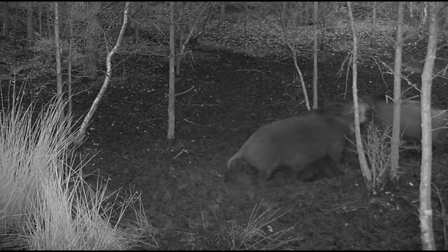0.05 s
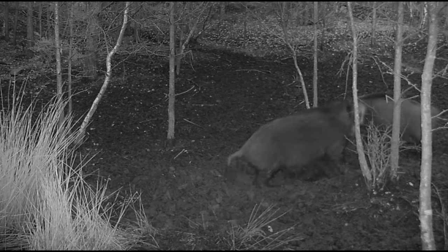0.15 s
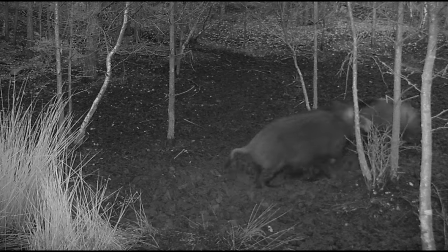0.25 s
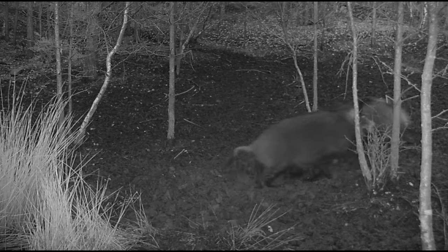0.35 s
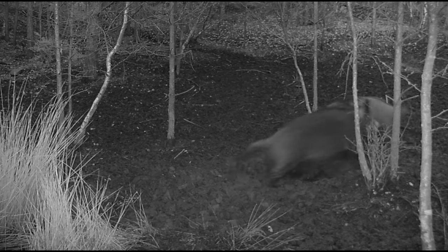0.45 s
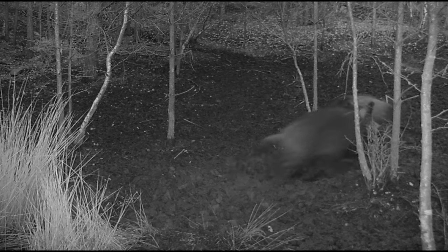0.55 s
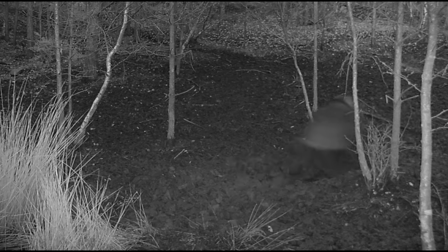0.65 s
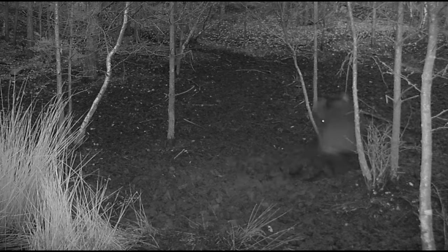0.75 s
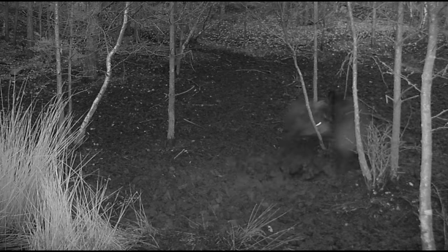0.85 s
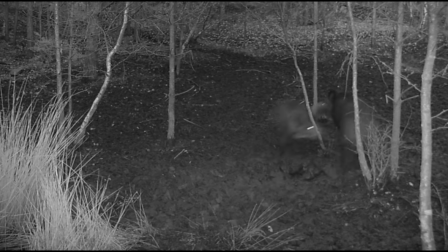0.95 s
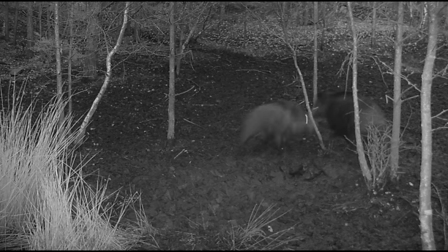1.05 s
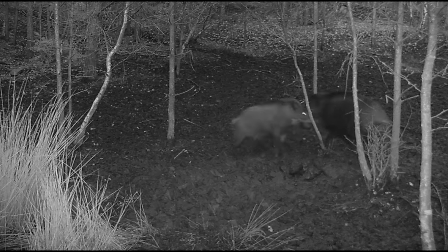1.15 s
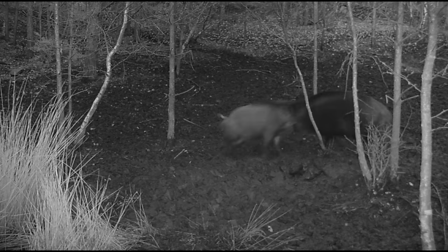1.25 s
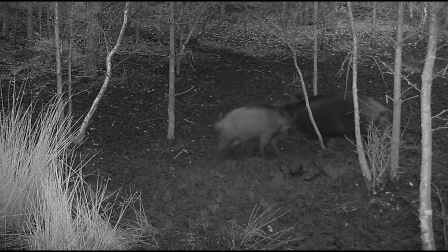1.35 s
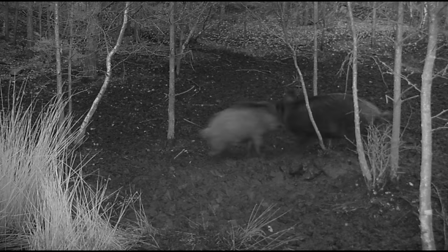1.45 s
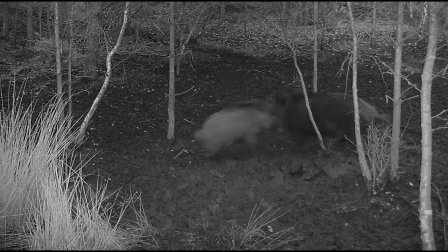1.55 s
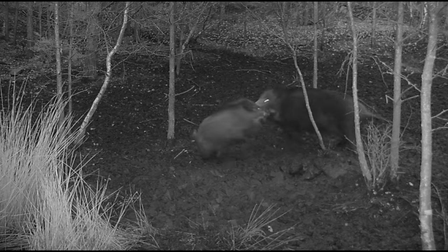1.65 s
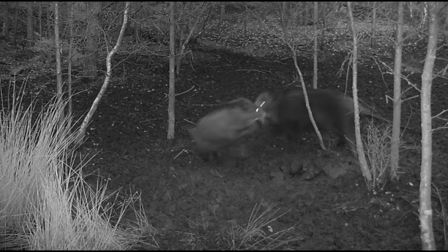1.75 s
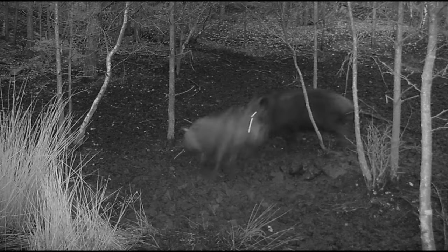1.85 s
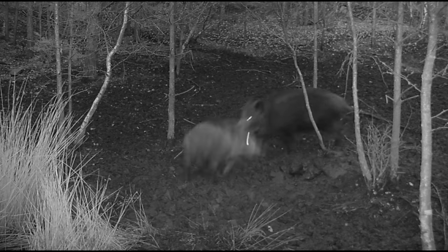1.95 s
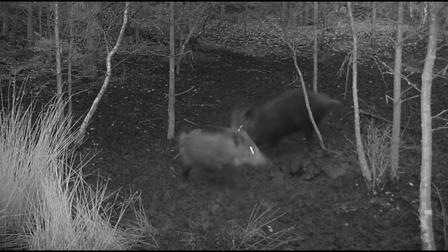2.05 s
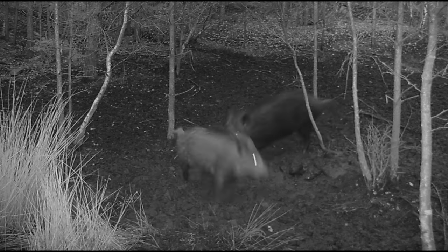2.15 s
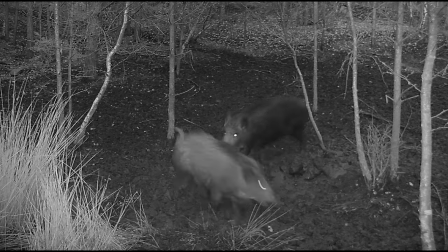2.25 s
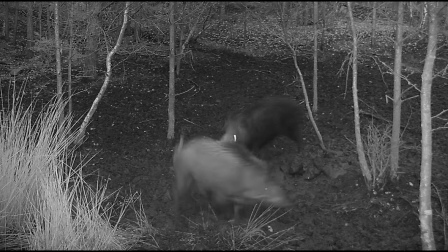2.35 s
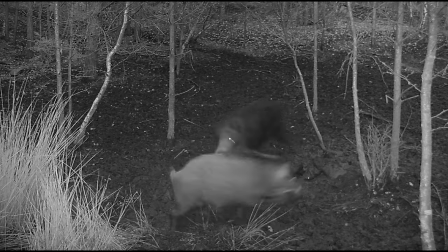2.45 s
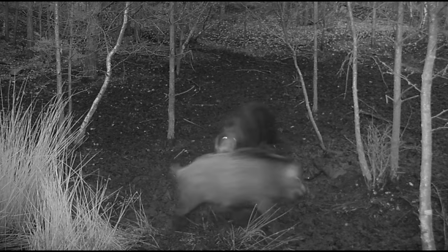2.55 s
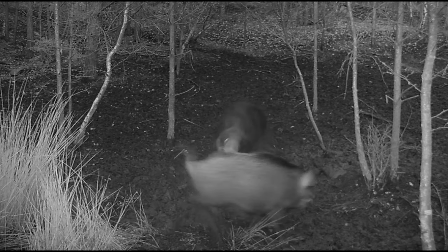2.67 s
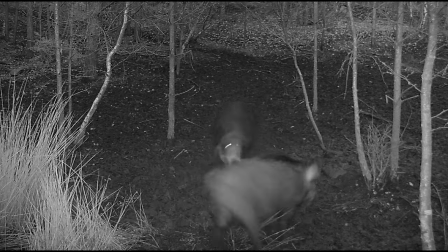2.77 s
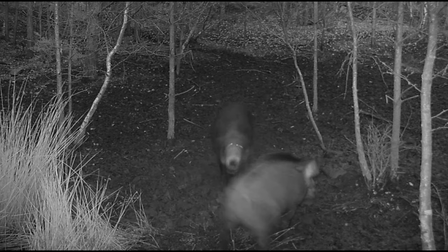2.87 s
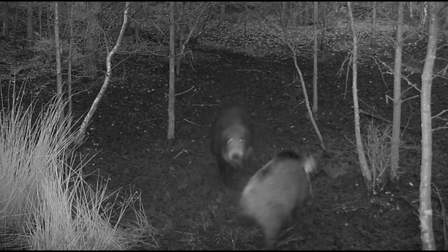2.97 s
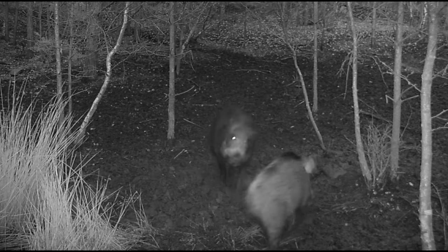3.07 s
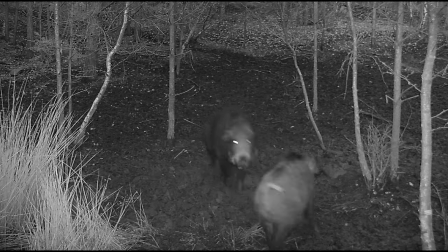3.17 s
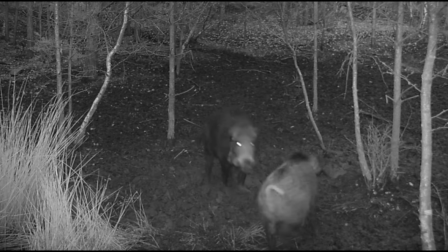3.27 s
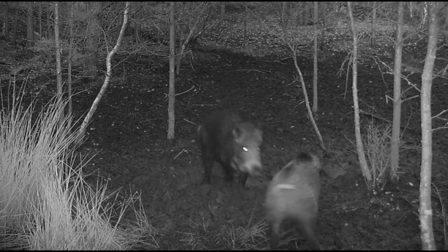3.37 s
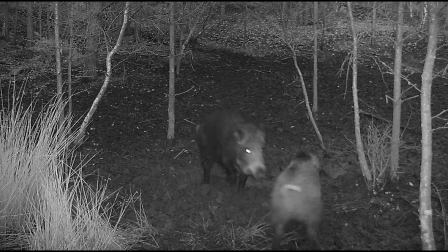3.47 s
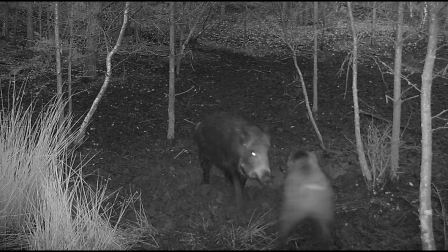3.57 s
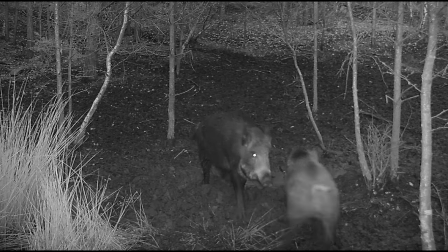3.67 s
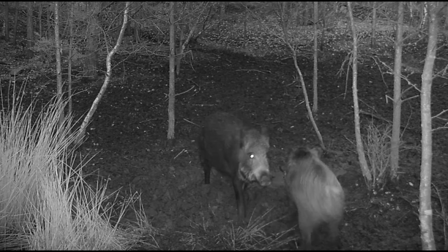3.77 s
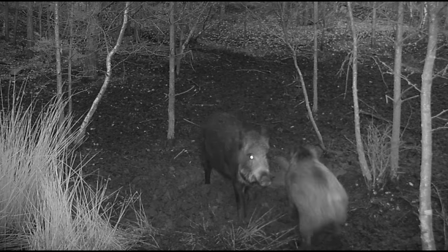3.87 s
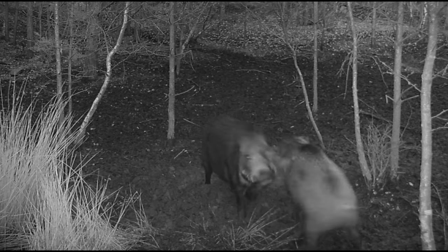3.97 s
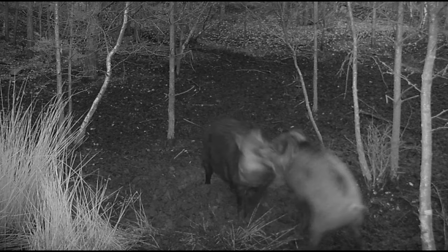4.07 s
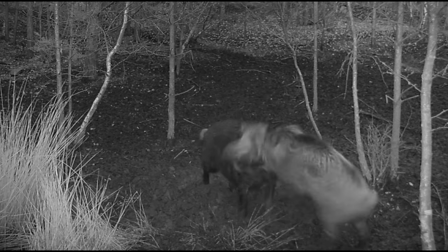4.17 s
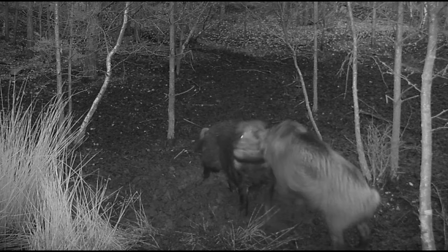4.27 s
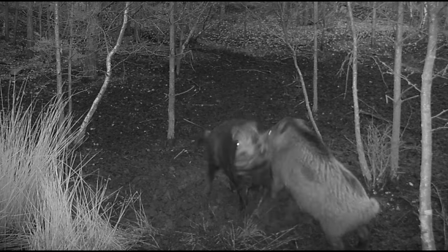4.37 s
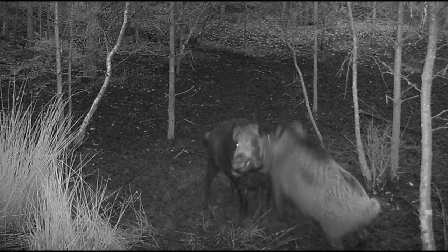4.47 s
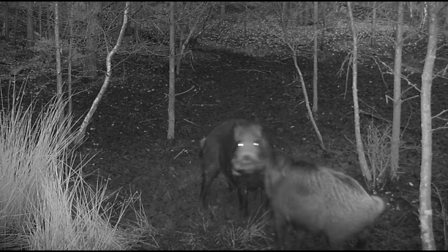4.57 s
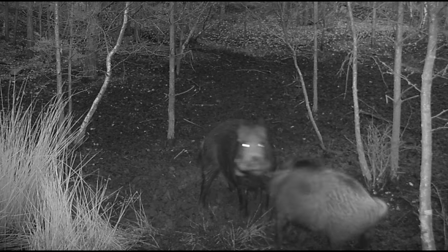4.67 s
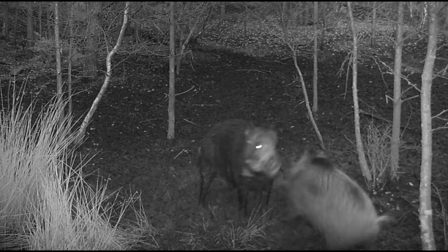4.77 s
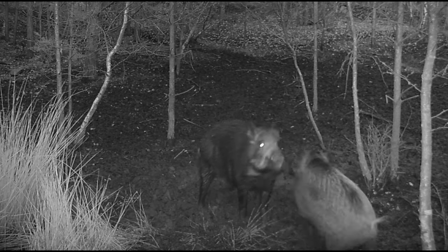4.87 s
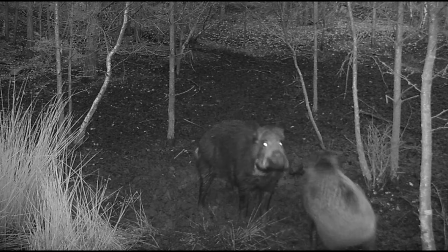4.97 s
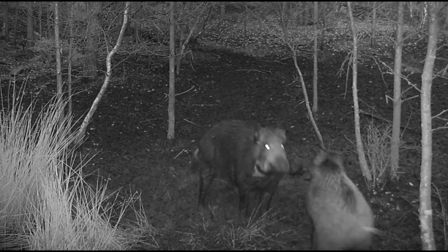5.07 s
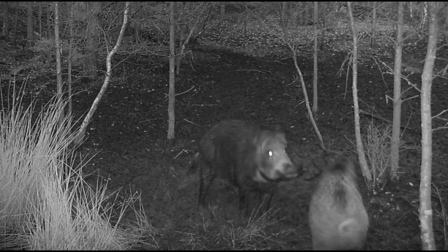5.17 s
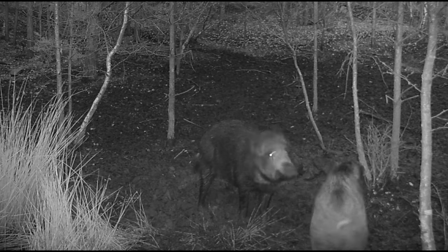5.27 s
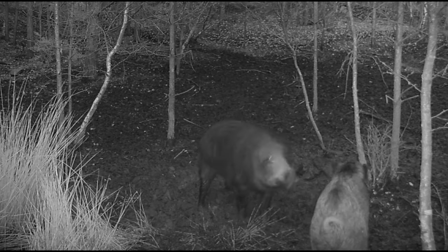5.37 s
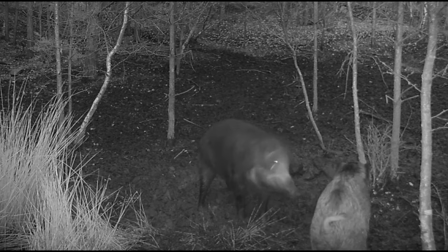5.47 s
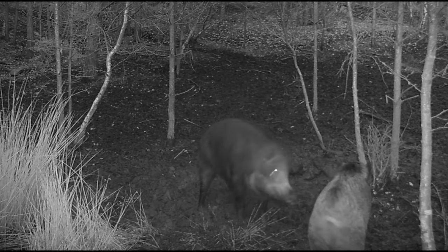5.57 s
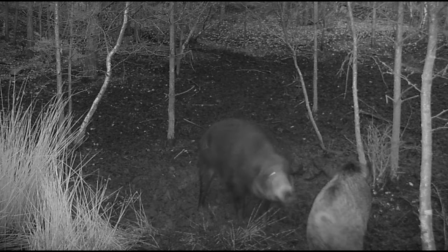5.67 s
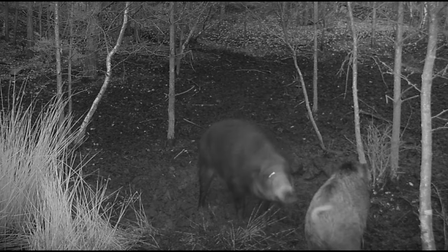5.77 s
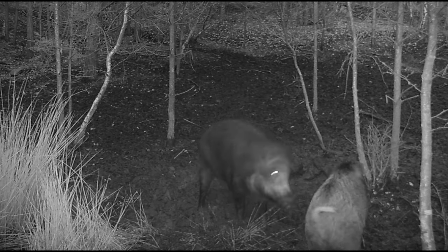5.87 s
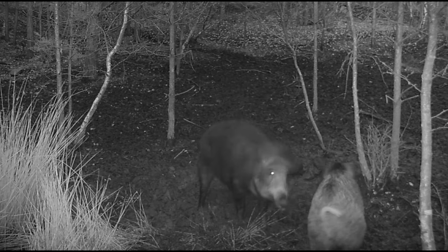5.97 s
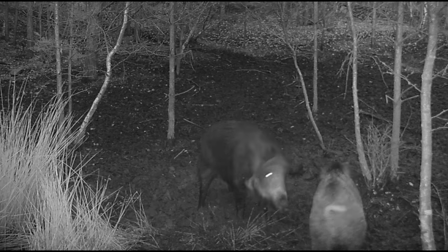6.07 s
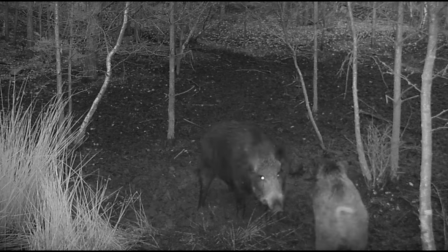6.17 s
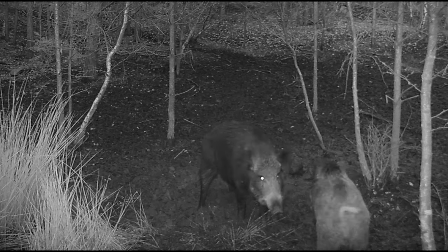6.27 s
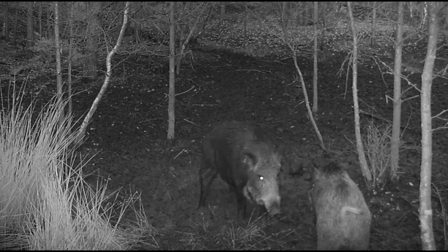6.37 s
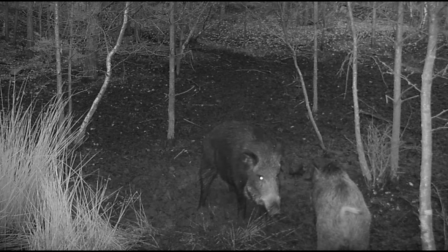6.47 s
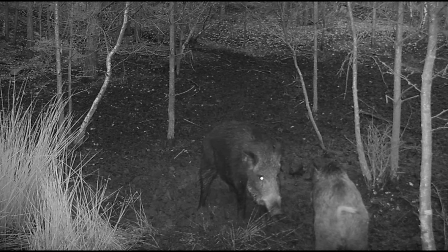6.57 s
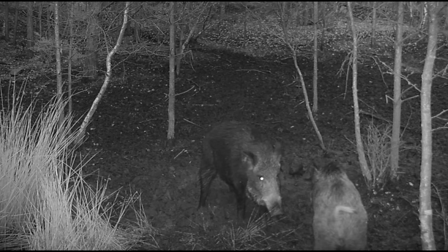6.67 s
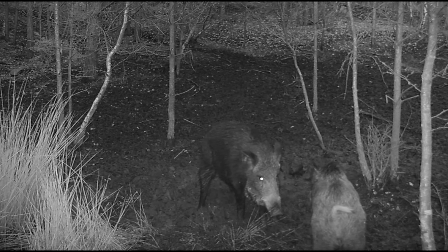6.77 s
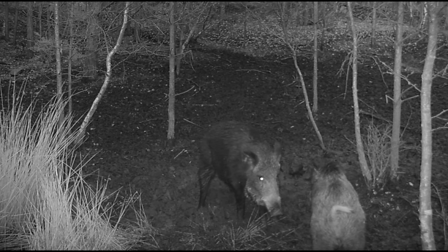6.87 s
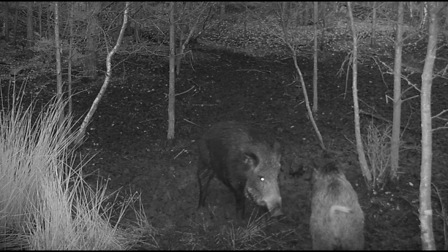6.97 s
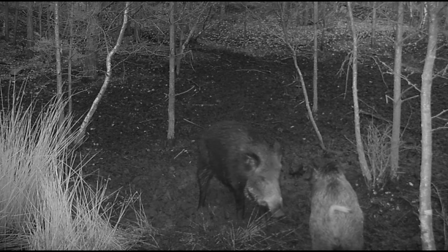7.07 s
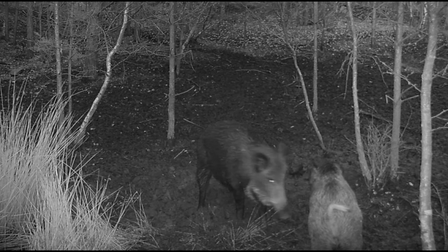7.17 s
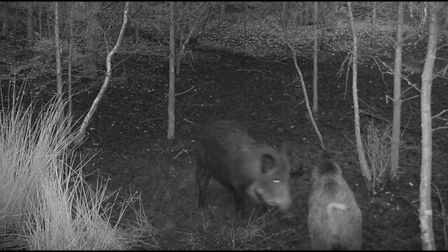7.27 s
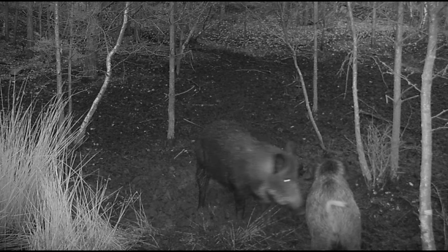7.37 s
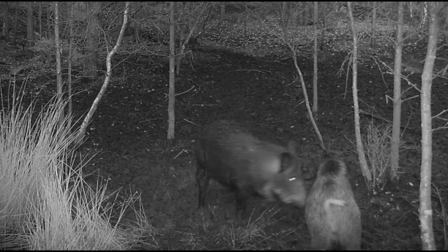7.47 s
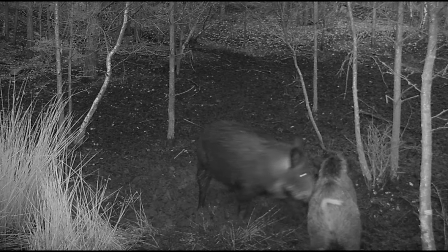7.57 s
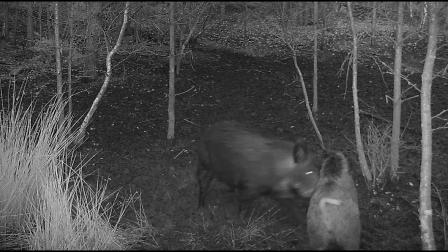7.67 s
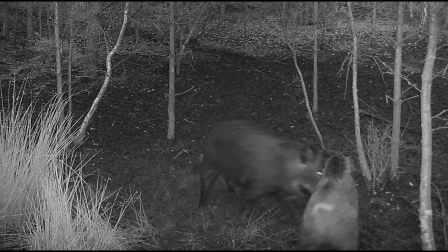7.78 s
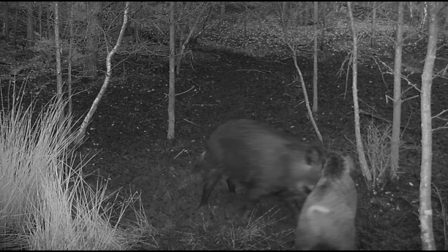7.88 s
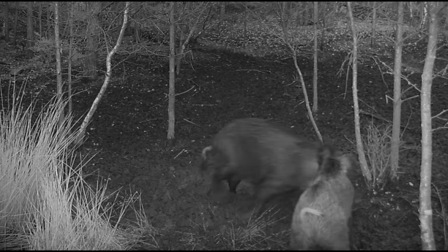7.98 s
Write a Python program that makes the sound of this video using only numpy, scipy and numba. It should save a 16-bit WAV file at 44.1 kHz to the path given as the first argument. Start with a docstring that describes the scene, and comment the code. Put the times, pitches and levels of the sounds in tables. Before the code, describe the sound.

A quiet night forest, two wild boars a few metres away, with a faint steady hiss and short diffuse echoes from the trunks. Leaves scuff at once, and a short hoarse squeal comes at 0.1 s. From 0.65 to 0.93 s a loud scream arches up and down, a high whistle torn by rough fluttering, with a brief squeal on its tail. Another short squeal at 1.4 s holds a sharp click and leads into a second, harsher scream at 1.6-1.87 s, then a weak squeal near 2 s. From 2 to 4 s hooves crunch and twigs snap dryly, with faint grunts at 3.0 and 3.8 s. Rattling, snorty grunts cluster from 4.05 to 4.9 s, with strong clicks and a faint squeal at 4.6 s. Crisp crunching continues to about 6 s, thins by 6.3 s, and nearly stops until 7.4 s. Light rustles and small crackling steps return until 8 s.

```python
"""Two wild boars jostle on a muddy forest floor at night, heard from a few metres.
Short squeals and two long screams come first: a high whistle torn by slower beats of the vocal folds.
Rattling grunts of chest and snout follow, with one last faint squeal among them.
Hooves crunch and leaf litter crackles throughout, sink to a lull, then stir again near the end.
Trunks scatter echoes of it all over a faint, even night hiss of filtered noise."""
import sys
import numpy as np
from scipy import signal
from scipy.fft import rfft, irfft
from scipy.io import wavfile
from scipy.ndimage import uniform_filter1d
from numba import njit

SR = 44100
rng = np.random.default_rng(int(sys.argv[2]) if len(sys.argv) > 2 else 0)


def dump_mix(stems):
    """Bounce the given channels to the path in sys.argv[1] as a 16-bit WAV at rate SR."""
    frames = np.atleast_2d(stems).T  # one column per channel
    limited = np.clip(frames, -1, 1)  # hard clip at full scale
    pcm = np.round(limited * 32767).astype(np.int16)
    wavfile.write(sys.argv[1], SR, pcm)


N = 353946
TIME = np.arange(N) / SR

# All levels are relative: filters and mixing gains act on them later.
# long screams, one list each: time_s, overtone_db, whistle_db, harsh_top_db (re overtones),
# low_voice_db, air_db, mouth_hz
SCREAM_EFFORT = [
    [(0.655, -50, -60, -10.5, -67, -76, 3140), (0.673, -41, -54, -15, -67, -79, 3150),
     (0.719, -37.5, -59, -11, -69, -69, 3140), (0.741, -36, -47, -5, -62.5, -55, 3100),
     (0.757, -29, -38.5, -11, -65, -52, 3120), (0.777, -29, -35.5, -10.5, -54.5, -53, 3230),
     (0.793, -21, -27.5, -16.5, -61, -59, 3130), (0.815, -27, -35, -11.5, -57, -58, 3190),
     (0.855, -36.5, -28.5, -4, -63, -52.5, 3400), (0.883, -28.5, -41, -17, -65, -58, 3170),
     (0.93, -46, -57, -13.5, -76, -70.5, 3220)],
    [(1.598, -54.5, -70.5, -11, -79, -71.5, 3090), (1.606, -41.5, -42, -6, -74, -69, 3000),
     (1.62, -29.5, -25.5, -9.5, -72, -62, 3060), (1.64, -20, -32, -10, -63.5, -55, 3070),
     (1.674, -21, -31, -13, -67, -55, 3190), (1.7, -27, -38.5, -10.5, -65.5, -59, 3070),
     (1.714, -17, -35, -15.5, -67.5, -53.5, 3060), (1.744, -27, -39.5, -7, -62, -51, 3110),
     (1.766, -31, -45.5, -8, -61.5, -53.5, 2980), (1.81, -29, -43.5, -7, -65, -54.5, 3150),
     (1.875, -45.5, -63.5, -10, -86, -83, 3070)],
]
# arch of the whistle over each scream: time_s, pitch_hz
SCREAM_WHISTLE = [
    [(.65, 852.4), (.71, 1045), (.745, 1336), (.785, 1495), (.812, 1547), (.87, 1416), (.92, 1340)],
    [(1.6, 1162), (1.63, 1247), (1.655, 1425), (1.69, 1307), (1.72, 1336), (1.77, 1190), (1.85, 898.5)],
]
# shorter squeals: start_s, attack_s, hold_s, release_s, overtone_db, whistle_db,
# harsh_top_db (re overtones), low_voice_db, air_db, first_pitch_hz, glide_octaves_per_s, mouth_hz
SHORT_SQUEALS = [(0.121, .036, .05, 0.056, -32.5, -48, -9, -75.5, -61, 1377, -3, 2750),
                 (.94, .02, .055, .085, -34.5, -47.5, -11, -66.5, -57.5, 1569, -3, 3130),
                 (1.405, 0.053, 0.05, .03, -35, -49, -10.5, -62.5, -69, 1026, 2, 2850),
                 (1.955, .022, .015, .085, -36.5, -48, -8, -59.5, -66, 1103, -2, 3150),
                 (4.626, .03, 0.21, 0.035, -50, -52.5, -28, -70, -87, 1043, -0.5, 3214)]
# throat resonances beside that of the mouth: centre_hz, width_hz, level_db
THROAT_MODES = [(2540, 1000, -20), (3880, 1100, -11)]
# spectrum of the highest throat resonances: frequency_hz, level_db
THROAT_TREBLE = [(2000, -60), (3800, -16), (4450, 1), (4900, -1), (5800, -6), (7200, -10.5), (8000, -21),
                 (10500, -28), (12300, -30), (13500, -44)]
# grunts: start_s, hold_s, rasp_db, chest_db
GRUNT_CALLS = [(3.02, 0.024, -63, -63), (3.764, 0.026, -53.5, -61), (4.066, 0.042, -41, -53.5),
               (4.128, 0.013, -50, -50), (4.283, 0.059, -39, -49), (4.524, 0.035, -34, -47.5),
               (4.574, 0.026, -31.5, -47), (4.651, .05, -46.5, -55), (4.791, 0.085, -50, -55.5)]
# resonances of a grunt in chest and snout: centre_hz, width_hz, level_db
CHEST_MODES = [(293.4, 159, -26), (611, 79, -9.5), (904, 150, -4.5), (1504, 140, -1.5), (1760, 390, -3)]
SNOUT_MODES = [(2120, 140, -7.5), (2570, 122, 3), (2980, 150, 4), (3380, 160, 10), (3996, 97, -12.5),
               (4636, 100, -4.5), (6200, 330, -14)]
# hoof falls, snaps and one sharp click inside a short squeal (at 1.43 s):
# time_s, level_db, crisp_db and thud_db (both re level_db), note_hz
STEPS_AND_CLICKS = [(.0114, -41, -7, -29, 2870), (.522, -38.5, -32, -0.5, 3710),
                    (.6031, -43, -26, 2.5, 3460), (.628, -32.5, -36, -9.5, 3470),
                    (.6718, -33, -20.5, -22, 2990), (1.1884, -39.5, -31, -14, 3560),
                    (1.292, -38, -23, -42, 3450), (1.3585, -41, -5.5, -28, 3534),
                    (1.4282, -28, -37, -14, 3300), (1.9171, -37.5, -31, -7.5, 2020),
                    (2.1089, -31, -31, -20, 2995), (2.2949, -34.5, -22, -8, 3220),
                    (2.372, -35, -28, -10.5, 3500), (2.5034, -35.5, -20, -17, 3250),
                    (2.665, -35.5, -28, -23, 3290), (3.034, -35, -40, -7, 3020),
                    (3.235, -35.5, -19, -20, 3350), (3.4119, -38.5, -27, -28, 3340),
                    (3.457, -34, -33, -14, 3130), (3.7392, -32.5, -34, -22, 2540),
                    (3.834, -36.5, -11, -18, 3240), (3.8781, -30.5, -14.5, -47, 3200),
                    (3.945, -39, -30, -15, 3800), (4.0407, -37.5, -9, -22, 3370),
                    (4.1647, -29.5, -42, -16, 3240), (4.2308, -40, -20, -6, 3250),
                    (4.3371, -23.5, -16.5, -30, 3340), (4.6678, -25.5, -14, -20, 3260),
                    (4.707, -29, -31, -19, 3430), (4.897, -29.5, -16, -13, 3360),
                    (4.978, -34.5, -11.5, -27, 3330), (5.0717, -34.5, -29, -34, 3670),
                    (5.1704, -35, -6, -31, 3550), (5.2655, -39, -10.5, -38, 3350),
                    (5.4013, -40.5, -9, -37, 3120), (5.46, -30.5, -17.5, -24, 3460),
                    (5.5794, -35.5, -29, -15.5, 2956), (5.684, -36.5, -11.5, -10, 3300),
                    (5.775, -45.5, -9, 0.5, 3270), (5.8208, -37, -9, -8.5, 3410),
                    (5.9633, -33.5, -13.5, -34, 3540), (5.9793, -40, -30, -28, 3410),
                    (6.2794, -45.5, -18, -12, 3430), (6.3213, -43.5, -37.5, -1, 2980),
                    (7.5464, -44, -28, -13, 3280), (7.6148, -44.5, -29, -8, 2660),
                    (7.7756, -37, -17.5, -30, 2380), (7.9473, -41.5, -7.5, -36, 3280)]
# rustle of the litter as the animals move and come to rest: time_s, level_db
LITTER_LEVEL = [(0, -49), (.45, -53.5), (.7, -48.5), (1.2, -55), (1.9, -50.5), (2.12, -52.5), (2.7, -52.5),
                (3.68, -61), (3.8, -56), (4.05, -52.5), (4.5, -62.5), (4.88, -51), (5.2, -69.5),
                (5.55, -56.5), (6.05, -64.5), (6.5, -75.5), (7.35, -77), (8.02, -60.5)]
# legs dragged through the leaves: peak_s, level_db
LEAF_SCUFFS = [(0, -41), (2.491, -47.5), (4.68, -39.5), (5.059, -45.5), (5.427, -47.5), (7.53, -58.5)]
# spectra of breaking litter, its crisp treble, the thud and the night: frequency_hz, level_db (per Hz)
CRUNCH_SPECTRUM = [(410, -52), (700, -13), (1200, -36.5), (1370, -18.5), (1660, -10), (1860, -12),
                   (3330, 5.5), (3650, 4.5), (4300, -6.5), (4610, -4.5), (5270, -14.5), (6730, -30),
                   (8000, -37), (10400, -61), (17600, -120)]
CRISP_SPECTRUM = [(4000, -16), (6000, 2), (8000, -3.5), (12000, -3.5), (13500, -16), (16000, -23.5)]
THUD_SPECTRUM = [(30, -45.5), (110, -16), (220, -11), (550, -7.5), (1000, 0.5), (1600, 4.5), (2500, -9.5),
                 (4000, -38.5)]
NIGHT_SPECTRUM = [(15, -49.5), (25, -21), (59, -2), (119, -12), (215, -10.5), (253, -10), (313, -10),
                  (389, -11), (495, -11), (722, -7.5), (804, -5), (1020, -5), (2010, -9), (4750, -18),
                  (15500, -20)]
# voice echoes from the ground and the nearest trunks: delay_s, level_db
FIRST_ECHOES = [(.0032, -26.5), (0.0116, -13), (0.019, -21)]

SWELL_DB = 20  # rise or fall within one attack or release
# the folds beat faster with effort
EASY_DB, FOLD_HZ, FOLD_OCTAVES_PER_DB = -35, 290, .011
# a harsher voice blurs the mouth resonance
HARSH_DB, MOUTH_WIDTH_HZ, WIDENING = -9, 760, 2.1
# a whistle this high against the overtones turns pure; a hoarse one must stand higher
PURE_ABOVE_DB, PURE_RANGE_DB, HOARSE_LOSS_DB = -13.5, 3, 5.5
# below this effort the voice turns hoarse: unsteady in pitch and level
FIRM_DB, FIRM_RANGE_DB = -37, 3
HOARSE_WAVER, HOARSE_CHOP_DB = .05, 3.5
# phase slip of the overtones: always, and more in a harsh voice
SLIP_RADIANS, HARSH_SLIP_RADIANS = .45, .3
AIR_HZ, AIR_WIDTH_HZ = 9870, 4200  # hiss of air through the teeth
GRUNT_ATTACK_S, GRUNT_RELEASE_S = 0.0095, 0.031
JAW_OCTAVES, JAW_RATE_HZ = 0.05, 150  # flapping flesh shakes the grunt resonances
TWIG_HZ, TWIG_SCATTER = 3200, 0.16  # note of what breaks under a lighter step
# lighter steps: level over the rustle, treble and thud against the step, random scatter
LIGHT_STEP_DB, LIGHT_CRISP_DB, LIGHT_THUD_DB, LIGHT_SCATTER_DB = 6.5, -12.5, -13.5, 4.5
LITTER_CRISP_DB = -12
SCUFF_ATTACK_S, SCUFF_RELEASE_S, SCUFF_CRISP_DB = 0.063, 0.039, -11
NIGHT_DB = -70
TOP_HZ = 15750


def squeals():
    """Amplitude modulation: slow folds split each whistle overtone into sidebands that ring the throat."""
    overtone_db, whistle_db, top_db, low_db, air_db, mouth_hz, pitch = effort()
    strain_db = np.maximum(overtone_db - EASY_DB, -SWELL_DB)
    fold_hz = FOLD_HZ * 2 ** (FOLD_OCTAVES_PER_DB * strain_db)
    mouth_width = np.clip(MOUTH_WIDTH_HZ * undb(WIDENING * (top_db - HARSH_DB)), 180, 1400)
    hoarse = .5 + .5 * np.tanh((FIRM_DB - overtone_db) / (2 * FIRM_RANGE_DB))
    purity_db = whistle_db - overtone_db - PURE_ABOVE_DB - HOARSE_LOSS_DB * hoarse
    pure = .5 + .5 * np.tanh(purity_db / (2 * PURE_RANGE_DB))
    rasp, fold_phase = folds(fold_hz, jitter=.03 + .07 * hoarse, shimmer_db=3, air=1.2, open_share=.6)
    # the harsher the voice, the more its overtones slip apart
    slip = SLIP_RADIANS + HARSH_SLIP_RADIANS * np.clip(.5 + (top_db - HARSH_DB) / 10, 0, 1)
    waver = .012 * walk(130) + HOARSE_WAVER * hoarse * walk(220)
    phase = 2 * np.pi * np.cumsum(pitch * (1 + waver)) / SR

    def partial(k, side):
        """Superposition: overtone k, or one of its sidebands, swells and slips on its own."""
        gain = undb(4.5 * walk(75) - 3 * abs(side))
        return gain * np.sin(k * phase + side * fold_phase + slip * k ** .5 * walk(170))

    overtones = unit(sum(partial(k, side) for k in range(1, 8) for side in (-1, 0, 1)))
    source = overtones + .35 * rasp
    # air forced past the folds roughens the top most
    torn = source + .55 * noise() * undb(2 * np.sin(fold_phase))
    mouth = steady(resonate(source, mouth_hz, mouth_width))
    sides = sum(undb(db) * steady(resonate(source, hz, width)) for hz, width, db in THROAT_MODES)
    snout_band = signal.butter(4, [1850, 4150], "band", fs=SR, output="sos")
    snout = signal.sosfilt(snout_band, mouth + sides)
    harsh_top = undb(top_db - 1.5) * steady(colour(torn, THROAT_TREBLE))
    throat = undb(-0.2) * steady(snout) + harsh_top
    # the whistle crossfades between a pure tone and a rough band
    tone = unit(np.sin(phase + 0.053 * np.sin(fold_phase)) * undb(1.5 * walk(100)))
    rough = steady(resonate(source + 1.8 * rasp, 1470, 420))
    whistle = np.sqrt(pure) * tone + np.sqrt(1 - pure) * rough
    fold_tone = unit(np.sin(fold_phase) * undb(2.8 * walk(70)))
    low = 0.53 * fold_tone + 0.94 * steady(resonate(rasp, 550, 300))
    air = steady(resonate(torn, AIR_HZ, AIR_WIDTH_HZ))
    chop = undb(HOARSE_CHOP_DB * hoarse * (walk(110) - 0.9))
    voice = undb(whistle_db) * whistle + undb(overtone_db + 1.1 * walk(120)) * throat + undb(air_db) * air
    return chop * voice + undb(low_db) * low


def effort():
    """Control of phonation: screams follow curves; a shorter squeal swells, holds and fades on one glide."""
    rows = np.array(SHORT_SQUEALS)
    current = np.maximum(np.searchsorted(rows[:, 0] - .01, TIME) - 1, 0)
    start, attack, hold, release, *levels = rows[current].T
    overtone_db, whistle_db, top_db, low_db, air_db, hz, glide, mouth_hz = levels
    age = TIME - start
    fade = swell(age, attack, hold, release)
    pitch = hz * 2 ** (glide * np.clip(age, 0, attack + hold + release))
    squeal_controls = (overtone_db + fade, whistle_db + fade, top_db,
                       low_db + fade, air_db + fade, mouth_hz, pitch)
    screaming, *scream_controls = phrase(SCREAM_EFFORT)
    scream_controls += curves([row for scream in SCREAM_WHISTLE for row in scream])
    return [screaming * a + (1 - screaming) * b for a, b in zip(scream_controls, squeal_controls)]


def grunts():
    """Source and filter: slack folds rattle slowly and unevenly through chest and snout."""
    rasp, chest = np.zeros((2, N))
    for s, hold, rasp_db, chest_db in GRUNT_CALLS:
        push = undb(swell(TIME - s, GRUNT_ATTACK_S, hold, GRUNT_RELEASE_S))
        rasp += undb(rasp_db) * push
        chest += undb(chest_db) * push
    rattle, _ = folds(165, jitter=.22, shimmer_db=3, air=.7, open_share=.22)
    return rasp * tract(rattle, SNOUT_MODES) + chest * tract(rattle, CHEST_MODES)


def folds(hz, jitter, shimmer_db, air, open_share):
    """Relaxation oscillation: uneven fold closures, each with a puff of air; also their phase."""
    turns = np.cumsum(hz * np.exp(jitter * walk(250))) / SR
    cycle = turns.astype(int)
    pulses = unit(np.diff(cycle, prepend=0) * 1.)
    puffs = unit(np.exp(-(turns % 1) / open_share) * noise())
    shimmer = undb(shimmer_db * noise()[cycle])
    return (pulses + air * puffs) * shimmer, 2 * np.pi * turns


def tract(x, modes):
    """Parallel resonance: several modes side by side, each shaken on its own."""
    total = 0
    for hz, width, db in modes:
        shaken_hz = hz * 2 ** (JAW_OCTAVES * walk(JAW_RATE_HZ))
        total = total + undb(db) * unit(resonate(x, shaken_hz, width))
    return steady(total)


def steps_and_clicks(crack_s=0.0017, crumble_s=0.015, crumble_db=-11, press_s=0.0063, thud_s=0.0083,
                     ring_s=0.0065, size=5000, order=700):
    """Brittle fracture: each hoof fall, snap or click presses, cracks, crumbles and rings at its own note."""
    crunch, crisp, thud, twigs = np.zeros((4, N + 2 * size))
    t = (np.arange(size) - order) / SR  # order = samples of pressing ahead of the crack
    after, age = t >= 0, np.abs(t)
    crumbs = crackle(3000, 3.2)
    for s, level_db, crisp_db, thud_db, hz in list(STEPS_AND_CLICKS) + light_steps():
        at = max(int(s * SR) - order, 0) + np.arange(size)
        grit, mud = rng.standard_normal((2, size))
        modes = hz * np.exp(np.array([.01, .15, .3]) * rng.standard_normal(3))
        ring = np.array([1, .5, .4]) @ np.sin(2 * np.pi * modes[:, None] * t)
        loose = undb(crumble_db) * crumbs[at % N] * np.exp(-age / np.where(after, crumble_s, press_s))
        burst = grit * after * np.exp(-age / crack_s) + loose
        crunch[at] += undb(level_db) * burst
        twigs[at] += undb(level_db) * ring * after * np.exp(-age / ring_s)
        crisp[at] += undb(level_db + crisp_db) * burst
        # roots under the mud add a hollow knock
        knock_hz = 660 * np.exp(.12 * rng.standard_normal())
        knock = np.sin(2 * np.pi * knock_hz * t) * np.exp(-age / .009)
        thump = 0.93 * mud * np.exp(-age / thud_s) + 0.14 * knock
        thud[at] += undb(level_db + thud_db) * after * thump
    breaking = undb(-6.5) * colour(crunch[:N], CRUNCH_SPECTRUM)
    breaking += undb(-6.0) * colour(crisp[:N], CRISP_SPECTRUM)
    breaking += undb(-6) * resonate(twigs[:N], 2600, 4500)
    return breaking + undb(-7.5) * colour(thud[:N], THUD_SPECTRUM)


def light_steps(count=36):
    """Scattered impacts: small steps at random moments, their strength tied to the litter's rustle."""
    times = (np.arange(count) + rng.random(count)) * TIME[-1] / count
    level_db = np.interp(times, *np.transpose(LITTER_LEVEL)) + LIGHT_STEP_DB
    scatter = LIGHT_SCATTER_DB * rng.uniform(-1, 1, (count, 3))
    notes = TWIG_HZ * np.exp(TWIG_SCATTER * rng.standard_normal(count))
    return [(s, db + a, LIGHT_CRISP_DB + 2 * b, LIGHT_THUD_DB + 2 * c, hz)
            for s, db, (a, b, c), hz in zip(times, level_db, scatter, notes)]


def litter():
    """Crackling noise: leaves and wet soil break in quick fits as the animals shove; stalks ring briefly."""
    rustle, crisp = stirring()
    fits = unit(undb(4 * np.minimum(walk(55), 1.2)))
    leaves = crackle(1300, 3.6) * fits
    dry_tips = crackle(900, 3.2) * fits
    stalk_notes = np.geomspace(1400, 4600, num=9)
    stalks = unit(sum(resonate(crackle(60, 3), hz, 170) for hz in stalk_notes))
    body = 0.93 * colour(leaves, CRUNCH_SPECTRUM) + 0.89 * unit(colour(stalks * fits, CRUNCH_SPECTRUM))
    soil = undb(-12.5) * colour(crackle(1500, 2.7) * fits, THUD_SPECTRUM)
    treble = colour(.6 * leaves + 0.65 * dry_tips, CRISP_SPECTRUM)
    return rustle * undb(-3.5) * (body + soil) + crisp * undb(-1.5) * treble


def stirring():
    """Addition of powers: shuffling and scuffs set the levels of the rustle and its crisp treble."""
    shuffle = undb(curves(LITTER_LEVEL)[0])
    scuff = 0
    for s, db in LEAF_SCUFFS:
        age = TIME - s + SCUFF_ATTACK_S
        scuff = scuff + undb(db + swell(age, SCUFF_ATTACK_S, 0, SCUFF_RELEASE_S))
    crisp = np.hypot(undb(LITTER_CRISP_DB) * shuffle, undb(SCUFF_CRISP_DB) * scuff)
    return np.hypot(shuffle, scuff), crisp


def crackle(rate, spread_db):
    """Poisson impulses: random tiny fractures, rate a second, most weak and a few strong."""
    sizes = undb(spread_db * np.minimum(rng.exponential(size=N), 4))
    return unit((rng.random(N) < rate / SR) * sizes * np.sign(noise()))


def bounce(x):
    """Comb interference: a voice and its first echoes comb the gliding overtones."""
    return x + sum(undb(db) * np.interp(TIME - s, TIME, x, left=0) for s, db in FIRST_ECHOES)


def forest(x, t60=0.39, wet_db=-17):
    """Multiple scattering: trunks return a thin tail of echoes that falls 60 dB in t60 seconds."""
    tail = crackle(2500, 2.7) * np.exp(-np.log(1000) * TIME / t60) * (TIME > .012)
    tail = tail[:SR] / np.linalg.norm(tail)
    return x + undb(wet_db) * signal.fftconvolve(x, tail)[:N]


def night_hiss():
    """Stationary noise: a faint, even hiss with a fixed spectrum."""
    return undb(NIGHT_DB) * colour(noise(), NIGHT_SPECTRUM)


def undb(db):
    """Logarithmic level: decibels to an amplitude ratio."""
    return 10 ** (np.asarray(db) / 20)


def unit(x):
    """Normalisation of power: scale to an RMS of 1."""
    return x / np.sqrt(np.mean(x ** 2) + 1e-20)


def noise():
    """White noise: independent Gaussian samples."""
    return rng.standard_normal(N)


def curves(rows):
    """Linear interpolation: the columns of a table as one value per sample."""
    rows = np.array(sorted(map(tuple, rows)))
    return [np.interp(TIME, rows[:, 0], c) for c in rows[:, 1:].T]


def phrase(calls):
    """Gating: a soft gate that is open during the calls, then their smoothed columns."""
    gate = np.max([(TIME > c[0][0] - .012) & (TIME < c[-1][0] + .012) for c in calls], axis=0)
    columns = [gate * 1.] + curves([row for c in calls for row in c])
    return [uniform_filter1d(c, size=200) for c in columns]


def swell(age, attack, hold, release):
    """Exponential envelope: attack, hold and release in dB, each slope covering SWELL_DB in its time."""
    rise = np.maximum(1 - age / attack, 0)
    fall = np.maximum((age - attack - hold) / release, 0)
    return -SWELL_DB * np.minimum(rise + fall, 5)


def walk(rate):
    """Band-limited chance: smooth drift with about rate turns a second and an RMS of 1."""
    return unit(np.interp(TIME * rate, np.arange(N // 50), rng.standard_normal(N // 50)))


def steady(x, size=900):
    """Level control: hold the short-term RMS near 1, so that later gains set the loudness."""
    return x / np.sqrt(np.abs(uniform_filter1d(x ** 2, size)) + 1e-12)


def colour(x, points):
    """Minimum-phase filtering: a causal (Hz, dB) spectrum of unit power gain."""
    hz, db = np.transpose(points)
    size = 4096
    bins_hz = np.arange(size // 2 + 1) * SR / size
    log_gain = np.log(undb(np.interp(np.log(bins_hz + 1), np.log(hz), db)))
    # folding the cepstrum onto positive times makes the filter causal
    cepstrum = irfft(log_gain)[:size // 2]
    cepstrum[0] = 0
    response = irfft(np.exp(rfft(2 * cepstrum, size)))
    return signal.oaconvolve(x, response / np.linalg.norm(response))[:N]


@njit
def band(x, hz, width):
    """State-variable resonance: a band-pass whose centre and width may move."""
    y, b, l = np.empty(len(x)), 0., 0.
    for i in range(len(x)):
        g, k = np.tan(np.pi * hz[i] / SR), width[i] / hz[i]
        v = (b + g * (x[i] + 1e-18 - l)) / (1 + g * (g + k))
        b, l, y[i] = 2 * v - b, l + 2 * g * v, k * v
    return y


def resonate(x, hz, width):
    """Cascaded resonance: two equal band-passes give steep skirts."""
    hz = np.full(N, hz, float)
    width = np.full(N, width * np.pi / 2, float)  # offsets the narrowing by the cascade
    return band(band(x, hz, width), hz, width)


def scene():
    """Superposition: voices with first echoes, steps and litter among the trunks, over the night."""
    voices = bounce(squeals() + grunts())
    animals = voices + steps_and_clicks() + litter()
    return (forest(animals) + night_hiss())[None]


def record(dry):
    """Band limitation: a steep elliptic low-pass cuts the top."""
    return signal.sosfilt(signal.ellip(10, .2, 70, TOP_HZ, fs=SR, output="sos"), dry)


dry = scene()
out = record(dry)
dump_mix(out)
```